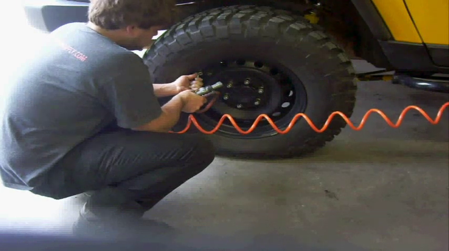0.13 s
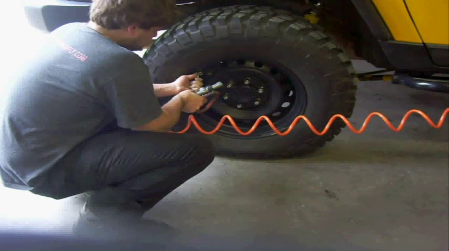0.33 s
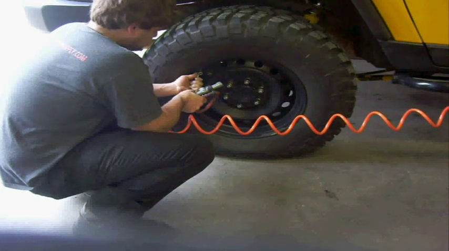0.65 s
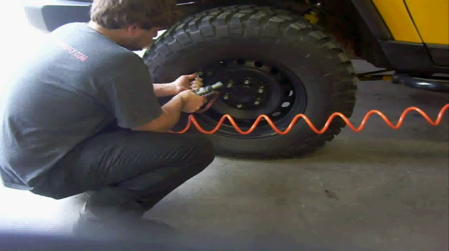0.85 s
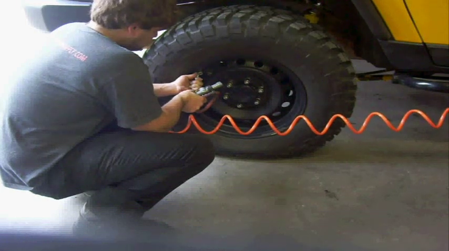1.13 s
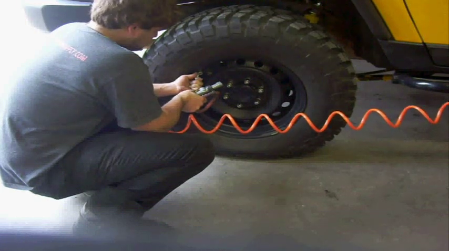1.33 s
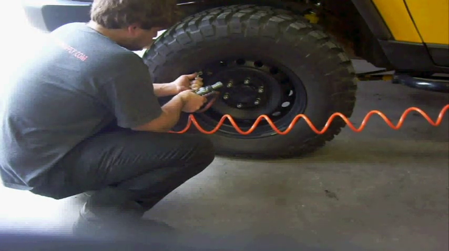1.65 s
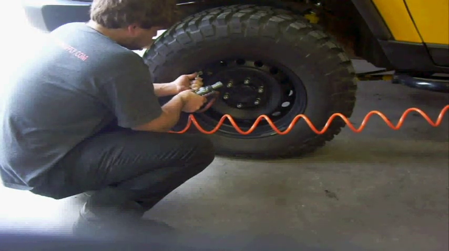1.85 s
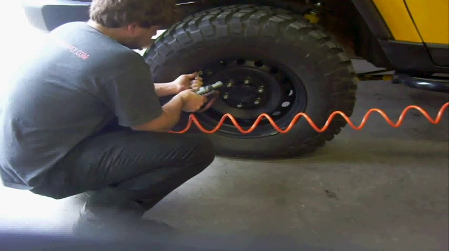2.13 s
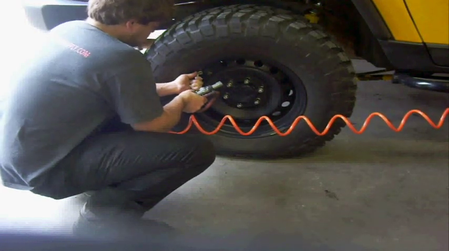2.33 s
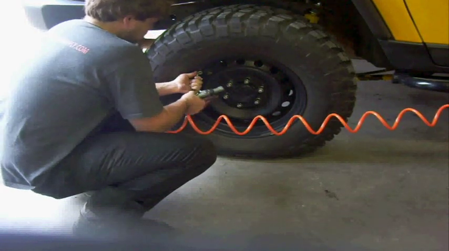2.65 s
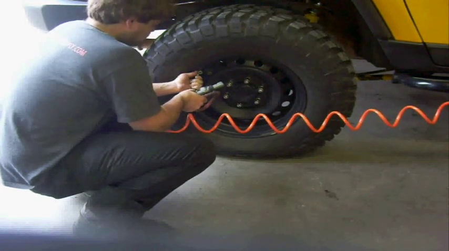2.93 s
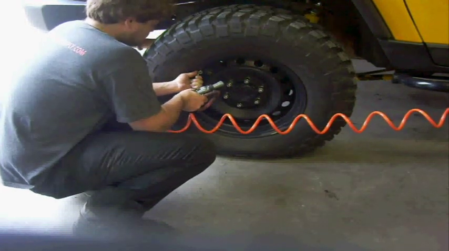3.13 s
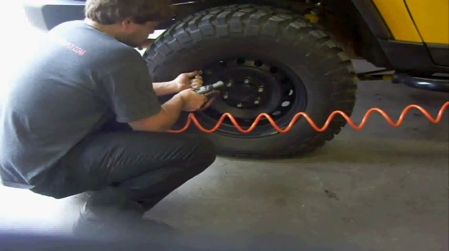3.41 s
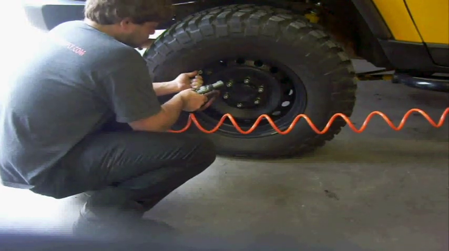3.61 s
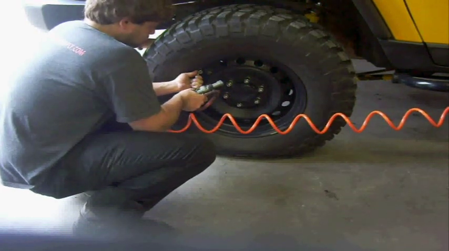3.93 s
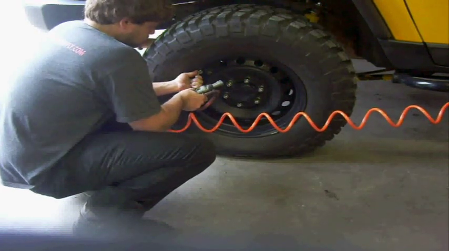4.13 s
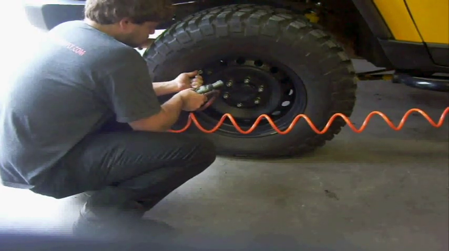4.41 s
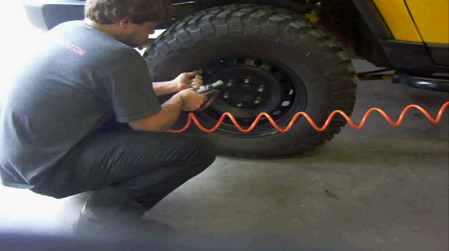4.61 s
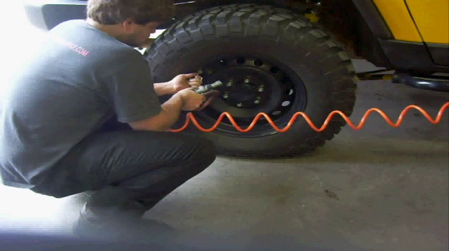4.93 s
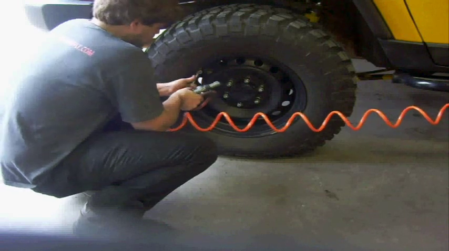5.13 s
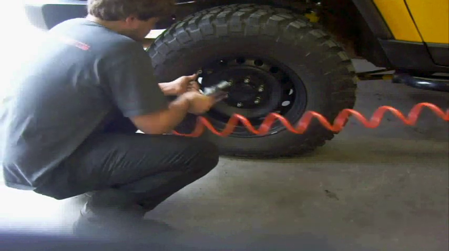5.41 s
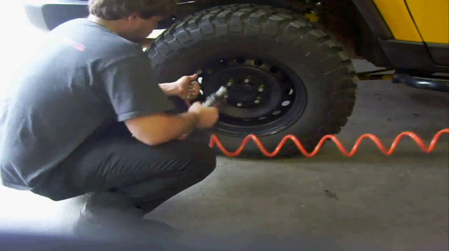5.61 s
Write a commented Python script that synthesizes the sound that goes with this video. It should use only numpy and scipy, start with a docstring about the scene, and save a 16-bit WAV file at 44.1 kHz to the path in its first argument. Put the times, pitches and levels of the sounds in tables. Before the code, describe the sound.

A small piston compressor runs throughout on a concrete floor, close to the microphone. Its rapid strokes fuse into a hard, nasal buzz with a strong whine near 1 kHz, bright valve chatter and fluttering air hiss. The tone colour shifts slightly after about two seconds, soft dull knocks come in the middle, and it shifts again near the end. The motor never stops.

```python
"""From the start a small piston compressor buzzes on a concrete floor: strokes ring pump head and housing,
valves chatter once a turn and air hisses in puffs, over faint low tones.
Someone crouched there, filling a tyre through a hose, leans in from 1.5 s, and the tone shifts.
Soft handling knocks fall between 2.3 and 4.8 s; after 5.1 s the arm draws the chuck away and it shifts again."""
import sys
import numpy as np
from scipy import signal
from scipy.fft import rfft, irfft
from scipy.io import wavfile
from scipy.ndimage import uniform_filter1d

SR = 44100
rng = np.random.default_rng(int(sys.argv[2]) if len(sys.argv) > 2 else 0)


def store_wav(level_fs):
    """Save 16-bit WAV to argv[1]."""
    pcm = np.round(np.clip(np.atleast_2d(level_fs), -1, 1) * 32767)
    wavfile.write(sys.argv[1], SR, pcm.T.astype(np.int16))


N = 254016
TIME = np.arange(N) / SR  # s

# ringing parts: (lowest, highest) multiple of the stroke rate
CRANKCASE, HEAD, HOUSING = (1, 7), (8, 17), (18, 44)
# the motor slows as the tyre pushes back, and recovers as the chuck comes off
FREE_HZ, LOAD_SAG_HZ = 114.27, 0.18
LOAD_FROM_S, LOAD_RISE_S = 1.7, 0.895
# levels sitting back, and the gains once the person leaves that posture
BUZZ_DB, BUZZ_LEAN_DB = -27.5, 1.62
VALVES_DB, AIR_DB, TREBLE_LEAN_DB = -30.0, -29.0, 0.7
RECORDER_TOP_HZ = 15750


def undb(db):
    """Decibels to gain."""
    return 10 ** (np.asarray(db) / 20)


def unit(x):
    """Scale to rms 1."""
    return x / np.sqrt(np.mean(x ** 2))


def curves(table):
    """Each column of a table after its times, joined by straight lines in time."""
    s, *columns = np.transpose(table)
    return [np.interp(TIME, s, column) for column in columns]


def colour(x, points):
    """Filter by a spectrum of (f/Hz, level/dB) points, joined by lines over log frequency."""
    hz, db = np.transpose(points)
    bins_hz = np.maximum(np.fft.rfftfreq(N, 1 / SR), 1)
    gain = undb(np.interp(np.log(bins_hz), np.log(hz), db))
    return irfft(rfft(x) * gain, N)


def walk(rate_hz):
    """Smooth chance with rms 1, changing about rate_hz times a second."""
    spectrum = rfft(rng.standard_normal(N))
    lowpass = np.exp(-(np.fft.rfftfreq(N, 1 / SR) / rate_hz) ** 2)
    return unit(irfft(spectrum * lowpass, N))


def postures():
    """Shares of sitting back, leaning in and drawing away; the body shades and reflects sound differently in each."""
    # how far the person leans in: (t/s, lean 0-1)
    lean_course = [(0, 0.2), (1.5, 0), (2.3, 0.72), (2.8, 1), (3.05, 1), (5.76, 0.82)]
    # how far the arm draws the chuck away: (t/s, reach 0-1)
    reach_course = [(0, 0.01), (5.12, 0.06), (5.38, 0.88), (5.55, 0.9), (5.76, 0.66)]
    lean = np.clip(curves(lean_course)[0], 0, 1)
    reach = np.clip(curves(reach_course)[0], 0, 1)
    return np.array([(1 - lean) * (1 - reach), lean * (1 - reach), reach])


def crank():
    """Turns made so far, one stroke each; the speed sags under the load of the tyre."""
    on_tyre = 1 - postures()[2]
    load = np.clip((TIME - LOAD_FROM_S) / LOAD_RISE_S, 0, 1) * on_tyre
    return np.cumsum(FREE_HZ - LOAD_SAG_HZ * load) / SR


def ringing(turns, part, tracked_db, bend_rad, waver=0.033, scatter_rad=0.92, reach_rad=2.4):
    """One part rung by every stroke: a stack of multiples of the crank speed."""
    # pump tone, relative within the housing; tracked multiples take their level from tracked_db instead:
    # (multiple of the stroke rate, level/dB sitting back, level/dB leaning in, level/dB drawn away)
    order_levels = [(1, -41.5, -42.5, -42), (2, -42.5, -41.5, -42.5), (3, -37.5, -39, -36.5),
                    (4, -44, -42.5, -42.5), (5, -67, -53, -59), (6, -40, -47, -39),
                    (7, -42.5, -54.5, -47.5), (8, -38, -37.5, -34), (9, -22, -24, -27), (10, -25, -32, -30),
                    (11, -30.5, -28, -31.5), (12, -34, -33, -33.5), (13, -30.5, -29, -32.5),
                    (14, -34.5, -35.5, -37.5), (15, -45.5, -54, -45), (16, -44.5, -46, -42.5),
                    (17, -64, -54, -67), (18, -49, -51.5, -54), (19, -36, -39.5, -34.5),
                    (20, -38.5, -38, -43), (21, -44.5, -38.5, -46), (22, -51, -52.5, -44),
                    (23, -40.5, -38, -46), (24, -47, -41, -42), (25, -41.5, -42.5, -40),
                    (26, -58, -59.5, -63), (27, -42, -43, -46), (28, -40, -36, -41), (29, -52, -48.5, -55),
                    (30, -38, -51, -43), (31, -43, -49, -36), (32, -39, -33, -42), (33, -43, -40, -47),
                    (34, -39.5, -36.5, -41), (35, -41, -49.5, -52), (36, -38.5, -39.5, -37),
                    (37, -51, -37, -38), (38, -45.5, -49.5, -42), (39, -36.5, -30.5, -32.5),
                    (40, -49, -39, -44), (41, -45, -55, -47), (42, -38, -34, -46), (43, -34, -39, -35.5),
                    (44, -41.5, -36.5, -33.5)]
    first, last = part
    levels_db = np.array(order_levels)[:, 1:]
    shares = postures()
    # a struck resonator answers after the blow: its phases follow from its levels, here those leaning in
    leaning_db = levels_db[:, 1]
    log_gain = np.log(undb(np.r_[leaning_db[0], leaning_db]))
    mirrored = np.r_[log_gain, log_gain[-2:0:-1]]
    lag_rad = -signal.hilbert(mirrored).imag
    out = 0
    for k in range(first, last + 1):
        drift = walk(4.6)
        # short waves arrive by many paths, which change as the arm moves
        scatter = scatter_rad * rng.standard_normal()
        paths_rad = (scatter + reach_rad * shares[2] * drift) * k / len(levels_db)
        if k in tracked_db:
            gain = undb(tracked_db[k])
        else:
            gain = undb(levels_db[k - 1]) @ shares * (1 + waver * drift)
        # each frequency crosses the metal at its own speed, which spreads the stroke over the turn
        phase = 2 * np.pi * k * turns + lag_rad[k] + bend_rad * k ** 2 + paths_rad
        out = out + np.sqrt(2) * gain * np.cos(phase)
    return out


def pump(turns, ninth_db, tenth_db, buzz_db, stroke_rough=0.015, buzz_rough=0.061):
    """The crankcase hums, the head drones near 1 kHz, the housing buzzes; roughness makes strokes differ."""
    crankcase = ringing(turns, CRANKCASE, {}, bend_rad=-0.86)
    head = ringing(turns, HEAD, {9: ninth_db, 10: tenth_db}, bend_rad=-0.2)
    drone = (crankcase + head) * (1 + stroke_rough * walk(70))
    buzz = ringing(turns, HOUSING, {}, bend_rad=0.76)
    # hold the running rms of the buzz at 1 before setting its level
    buzz = buzz / np.sqrt(uniform_filter1d(buzz ** 2, size=8192))
    return drone + buzz * (1 + buzz_rough * walk(150)) * undb(buzz_db)


def valves(turns, jitter_s=0.000006, size_db=0.94, uneven=0.085, ring_s=0.005):
    """The reed valves slap shut once a turn, strong and weak by turns, and ring the metal around them."""
    # chatter colour: (f/Hz, relative level/dB per Hz)
    chatter_colour = [(4900, -57), (5200, -5), (6100, 6), (6600, -10), (7400, 0.5), (8400, -10.5),
                      (9300, -9.5), (10000, -1), (10600, -4.5), (11400, 4.5), (12400, -3.5), (14000, -9.5),
                      (14900, 1), (15600, -9)]
    count = np.arange(1, int(turns[-1]))
    chance = rng.standard_normal((len(count), 2))
    at = (np.interp(count, turns, TIME) + jitter_s * chance[:, 0]) * SR
    size = undb(size_db * chance[:, 1]) * (1 + uneven * (-1) ** count)
    # a windowed sinc sets each click between samples
    taps = at.astype(int)[:, None] + np.arange(-8, 9)
    offset = taps - at[:, None]
    clicks = np.zeros(N)
    np.add.at(clicks, taps % N, size[:, None] * np.sinc(offset) * np.sinc(offset / 9))
    out = 0
    for share in postures():
        # each posture has its own pattern of reflections, which builds up and dies away
        ring = rng.standard_normal(N) * TIME * np.exp(-TIME / ring_s)
        chatter = unit(colour(signal.fftconvolve(clicks, ring)[:N], chatter_colour))
        out = out + np.sqrt(share) * chatter
    return out


def air(turns, puff=0.19, flutter=0.14, stroke_rough=0.05):
    """Air rushes through intake and valves, in uneven puffs that follow the piston."""
    # rush colour: (f/Hz, relative level/dB per Hz)
    rush_colour = [(25, -4), (55, -8.5), (170, -4), (300, -5.5), (850, -3.5), (1050, 3), (1350, 3),
                   (1900, -4.5), (3200, -3), (4600, 4.5), (5400, -1), (8500, 2), (11800, -11.5),
                   (14000, -11.5)]
    once_a_turn = puff * np.cos(2 * np.pi * (turns - 0.2))
    thrice_a_turn = flutter * np.cos(2 * np.pi * turns * 3)
    gate = 1 + once_a_turn + thrice_a_turn
    rush = rng.standard_normal(N) * gate * (1 + stroke_rough * walk(120))
    return unit(colour(rush, rush_colour))


def hum(wander_rad=0.93):
    """Faint low tones under the drone, each a sine whose phase wanders."""
    # steady tones: (f/Hz, rms level/dB)
    faint_tones = [(199, -57), (240, -56.5), (360, -56), (480, -54.5), (549, -54)]
    out = 0
    for hz, db in faint_tones:
        phase = 2 * np.pi * hz * TIME + wander_rad * walk(4.1)
        out = out + np.sqrt(2) * undb(db) * np.sin(phase)
    return out


def knocks(ring=4.0, sharpness=7.0):
    """Short dull bumps of handling: decaying noise, each with one broad resonance."""
    # handling knocks: (t/s, peak level/dB before the 1 dB added below, decay/s, resonance f/Hz)
    bumps = [(2.345, -31, .006, 251.2), (3.265, -32, 0.0081, 201), (4.047, -25, 0.022, 332),
             (4.085, -28, 0.013, 290), (4.102, -28, 0.0093, 664), (4.424, -28, .006, 199),
             (4.525, -37, .008, 600), (4.798, -25, .006, 200)]
    # their colour ahead of the resonance: (f/Hz, relative level/dB per Hz)
    bump_colour = [(40, -12), (200, -10.5), (650, -6), (1400, -18), (4000, -20), (12000, -42)]
    out = np.zeros(N)
    for s, db, decay_s, hz in bumps:
        age = np.maximum(TIME - s, 0)
        burst = rng.standard_normal(N) * (age > 0) * np.exp(-age / decay_s)
        bump = colour(burst, bump_colour)
        bump = bump + ring * signal.lfilter(*signal.iirpeak(hz, sharpness, fs=SR), bump)
        out += undb(db + 1) * bump / np.abs(bump).max()
    return out


def scene():
    """One crank drives tone, valves and air; leaning in lets more of the buzz and treble past."""
    # the two tracked multiples swell and fade as the body moves:
    # (t/s, ninth multiple level/dB, tenth multiple level/dB)
    whine_course = [(0.0, -22, -27), (1.76, -21.5, -23), (2.63, -20, -26.5), (2.82, -19.5, -23),
                    (3.06, -21, -32.5), (4.68, -21, -29.5), (5.2, -21.5, -29), (5.45, -27.5, -28),
                    (5.76, -21.5, -29)]
    turns = crank()
    ninth_db, tenth_db = curves(whine_course)
    leaning = 1 - postures()[0]  # leaning in or drawing away
    tone = pump(turns, ninth_db, tenth_db, BUZZ_DB + BUZZ_LEAN_DB * leaning)
    treble = undb(VALVES_DB) * valves(turns) + undb(AIR_DB) * air(turns)
    treble = treble * undb(TREBLE_LEAN_DB * leaning)
    return (tone + treble + hum() + knocks())[None]


def record(dry):
    """The recorder behind the microphone cuts the top steeply, with an elliptic low-pass."""
    return signal.sosfilt(signal.ellip(12, 0.1, 80, RECORDER_TOP_HZ, fs=SR, output="sos"), dry)


dry = scene()
out = record(dry)
store_wav(out)
```